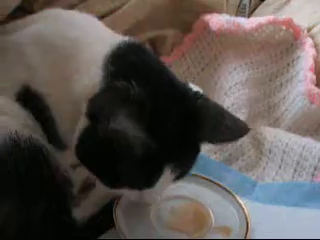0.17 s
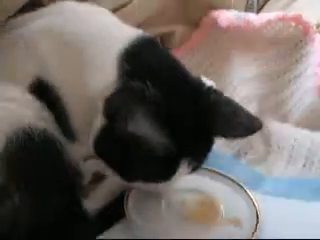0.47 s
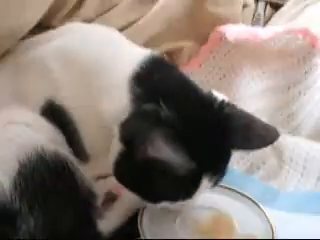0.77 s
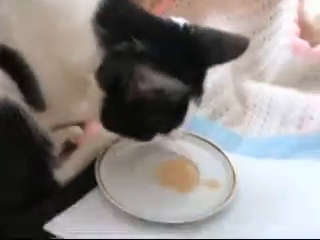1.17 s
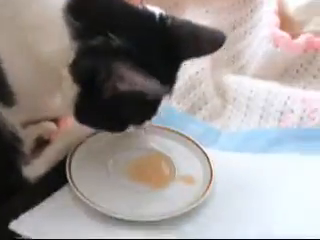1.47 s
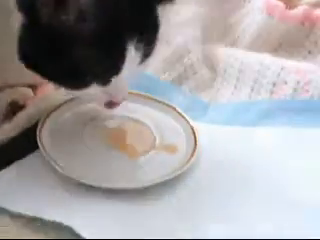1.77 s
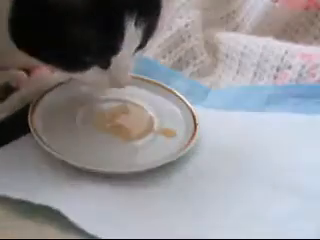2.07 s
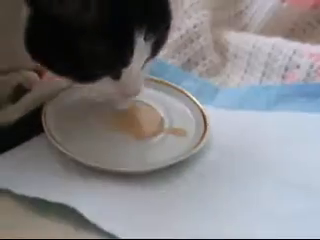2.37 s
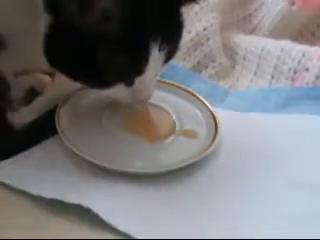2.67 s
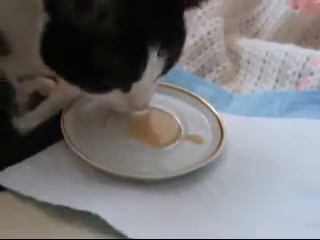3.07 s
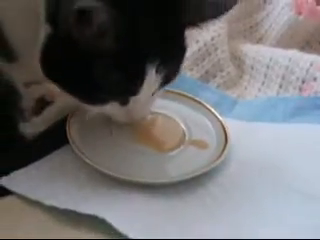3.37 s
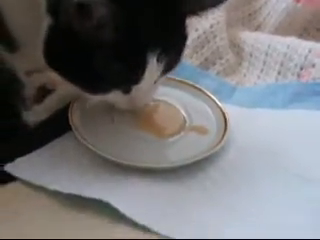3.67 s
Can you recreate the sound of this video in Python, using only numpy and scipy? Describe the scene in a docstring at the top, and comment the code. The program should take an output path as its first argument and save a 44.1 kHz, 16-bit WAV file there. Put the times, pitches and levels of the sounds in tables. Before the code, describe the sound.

A cat licks from a saucer, close up in a quiet room. A pop and low thump at 0.1 seconds start a steady grainy hiss and low hum. Sharp mouth clicks come near 0.2, 0.7 and 1.3 seconds. Short wet smacks with faint squelches cluster from 1.9 to 2.4 seconds. A few small ticks follow around 3.4 to 3.6 seconds. Faint handling rustle comes and goes.

```python
"""A cat licks milk from a saucer in a quiet room, close to a small hand-held camera.
Tongue and lips part in short wet smacks and sharp mouth clicks, with a faint squelch as the tongue slides.
A few small ticks and a soft handling rustle come and go. Mains hum and room noise lie under it all,
made grainy by a coarse 8-bit recorder that switches on with a pop and a thump."""
import sys
import numpy as np
from scipy import signal
from scipy.fft import rfft, irfft
from scipy.io import wavfile

SR = 44100
rng = np.random.default_rng(int(sys.argv[2]) if len(sys.argv) > 2 else 0)


def generate_wav(sig):
    """Save sig (samples, or channels by samples) to the path in sys.argv[1] as 16-bit PCM at SR."""
    pcm = np.round(np.clip(np.atleast_2d(sig).T, -1, 1) * 32767).astype(np.int16)
    wavfile.write(sys.argv[1], SR, pcm)


N = 168021

# Low thumps: the first two are the recorder switching on, the last two give body to mouth clicks.
# Each row: start in seconds, pitch in Hz, level in dB, ring time in seconds.
THUMPS = [(.1295, 110.5, -21.5, 0.016), (.1305, 657, -42, 0.057), (.1895, 300, -30.5, 0.011),
          (.7135, 410, -40, 0.0087)]


def cat_licking():
    """Tongue and lips part in smacks that ring the mouth; the wet tongue squelches as it slides."""
    # Each row: start in seconds, lower mouth resonance in Hz, its level in dB, upper resonance in Hz,
    # its level in dB, dull knock level in dB, ring time of the resonances in seconds.
    smacks = [(1.8554, 2600, -33, 3500, -34, -52, .005), (1.8783, 2650, -32, 4300, -44, -42, .004),
              (1.8860, 2750, -20, 6000, -26, -33, .002), (1.8883, 2350, -29, 3120, -24, -30, .0033),
              (2.0251, 2030, -20, 2680, -22, -38, .0055), (2.0261, 1300, -42, 4400, -31, -50, .006),
              (2.0609, 2100, -30, 3100, -37, -48, .005), (2.1342, 2600, -42, 4950, -31, -50, .005),
              (2.1565, 2400, -44, 3900, -37, -55, .005), (2.2510, 1940, -19.2, 2170, -17.1, -29, .005),
              (2.3375, 1900, -19.5, 4730, -27, -29, .0072)]
    # Each row: start in seconds, length in seconds, resonance in Hz, its width in Hz, level in dB.
    squelches = [(1.872, 0.057, 2790, 905, -49.5), (1.925, 0.075, 2410, 610, -51),
                 (2.14, 0.041, 3930, 800, -51.5), (2.294, 0.033, 5000, 503, -54),
                 (2.342, 0.032, 4790, 507, -56), (2.314, 0.026, 1700, 400, -45.5),
                 (2.346, 0.035, 1730, 354, -49)]
    return clicks(smacks) + rubs(squelches, grains_per_s=2900)


def mouth_clicks_and_ticks():
    """Sharp, bright mouth clicks come before the licking; a few small ticks follow it."""
    # Each row: start in seconds, lower resonance in Hz, its level in dB, bright resonance in Hz,
    # its level in dB, dull knock level in dB, ring time of the resonances in seconds.
    sharp_clicks = [(.1893, 1640, -30, 5680, -34.5, -30, 0.0069),
                    (.1933, 3400, -39, 6000, -33.5, -54, .008), (.3153, 2500, -33.5, 5840, -45, -55, .005),
                    (.7127, 2270, -30.5, 5750, -28, -34, 0.0033),
                    (1.3125, 4600, -34, 5560, -20.5, -38, .0036), (3.4142, 2000, -34, 6030, -38, -53, .003),
                    (3.4205, 3400, -27, 5800, -34, -48, .003), (3.4369, 1900, -30, 4080, -30.5, -43, .003),
                    (3.4462, 3800, -38.5, 5980, -37, -53, .005), (3.5005, 1700, -35, 3270, -33, -48, .003),
                    (3.6124, 1600, -27, 2600, -29.5, -42, 0.0022)]
    return clicks(sharp_clicks) + thumps(THUMPS[2:])


def handling_rustle():
    """The hand rubs softly on the camera."""
    # Each row: start in seconds, length in seconds, resonance in Hz, its width in Hz, level in dB.
    rustles = [(.17, 0.084, 1300, 2600, -53.5), (1.2, .06, 800, 380, -53), (1.26, 0.074, 820, 300, -52),
               (3.39, .08, 5900, 2100, -57), (3.1, 0.63, 210, 110, -58)]
    return rubs(rustles, grains_per_s=4500)


def switch_on_thump():
    """The recorder switches on with a low thump and a short ring."""
    return thumps(THUMPS[:2])


def mains_hum():
    """Harmonics of the mains drone under a thin electronic whine."""
    # Each row: multiple of the mains frequency, level in dB.
    harmonics = [(1, -51), (2, -60.5), (4, -60), (5, -60)]
    mains_hz, whine_hz, whine_db = 58.98, 5940, -70
    tones = [(multiple * mains_hz, db) for multiple, db in harmonics] + [(whine_hz, whine_db)]
    t = np.arange(N) / SR
    return sum(np.sqrt(2) * from_db(db) * np.sin(2 * np.pi * (hz * t + rng.random())) for hz, db in tones)


def room_tone():
    """Steady low room noise with microphone hiss on top."""
    # Each row: frequency in Hz, relative noise level in dB.
    spectrum = [(20, -11.5), (45, -0.5), (80, 1), (110, -2), (190, -1), (380, -8), (700, -6), (950, -9),
                (1250, -12.5), (2200, -14.5), (3800, -18.5), (5900, -17.5), (8000, -24)]
    level_db, top_hz = -49, 8000
    hz, db = np.transpose(spectrum)
    bin_hz = np.maximum(np.arange(N // 2 + 1) * SR / N, 1)
    colour = from_db(np.interp(np.log(bin_hz), np.log(hz), db)) * (bin_hz < top_hz)
    noise = irfft(rfft(rng.standard_normal(N)) * colour, N)
    return from_db(level_db) * rms_one(noise)


def clicks(rows):
    """Each click rings two resonances over a dull knock."""
    out = np.zeros(N)
    for start_s, low_hz, low_db, high_hz, high_db, knock_db, t60 in rows:
        ring = ping(low_hz, low_db, t60) - ping(high_hz, high_db, t60)
        knock = ping(hz=668, db=knock_db, t60=.0058)
        add(out, start_s, ring - knock)
    return out


def thumps(rows):
    """Each thump is one low resonance with a softened attack."""
    out = np.zeros(N)
    for start_s, hz, db, t60 in rows:
        add(out, start_s, -ping(hz, db, t60, attack_s=.00088))
    return out


def ping(hz, db, t60, attack_s=.0001):
    """A resonance swells quickly and dies away by 60 dB in t60 seconds."""
    t = np.arange(SR // 20) / SR
    attack = 1 - np.exp(-(t / attack_s) ** 2)
    decay = np.exp(-np.log(1000) * t / t60)
    return from_db(db) * np.sin(2 * np.pi * hz * t) * attack * decay


def rubs(rows, grains_per_s):
    """Each rub is a stream of tiny slips through one resonance, swelling and fading."""
    out = np.zeros(N)
    for start_s, length_s, hz, width_hz, db in rows:
        slips = rng.standard_normal(SR) * (rng.random(SR) < grains_per_s / SR)
        radius = np.exp(-np.pi * width_hz / SR)
        feedback = [1, -2 * radius * np.cos(2 * np.pi * hz / SR), radius ** 2]
        friction = rms_one(signal.lfilter([1, 0, -1], feedback, slips))
        swell = signal.windows.tukey(min(int(length_s * SR), SR), .5)
        add(out, start_s, from_db(db) * friction[:len(swell)] * swell)
    return out


def from_db(db):
    """Decibels to gain."""
    return 10 ** (np.asarray(db) / 20)


def rms_one(x):
    """Scale to an rms of 1."""
    return x / np.sqrt(np.mean(x ** 2) + 1e-20)


def add(out, start_s, sound):
    """Mix a sound in at its start time."""
    i = max(int(start_s * SR), 0)
    out[i:i + len(sound)] += sound[:max(N - i, 0)]


def scene():
    """Everything is close, dry and mono."""
    bed = room_tone() + mains_hum()
    return (bed + cat_licking() + mouth_clicks_and_ticks() + handling_rustle() + switch_on_thump())[None]


def record(dry):
    """An 8-bit recorder narrows the band, adds grain and pops as it starts."""
    sample_hz, step, start_s = 16000, 1 / 128, .1291
    offset = -.1045  # the converter rests below zero: the jump from silence is the pop
    input_lowpass = signal.butter(10, 6300, fs=SR, output="sos")
    output_lowpass = signal.ellip(10, .1, 80, 12800, fs=SR, output="sos")
    n = np.arange(N)
    narrowed = signal.sosfilt(input_lowpass, dry[0])
    hold_points = np.floor(n * sample_hz / SR) * SR / sample_hz  # each sample is held until the next
    held = np.interp(hold_points, n, narrowed)
    crushed = step * np.round((held + offset) / step)
    running = n >= start_s * SR
    return signal.sosfilt(output_lowpass, crushed * running)[None]


dry = scene()
out = record(dry)
generate_wav(out)
```